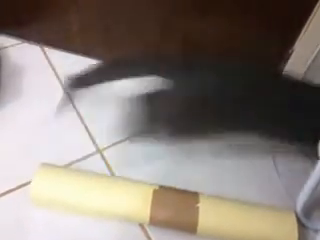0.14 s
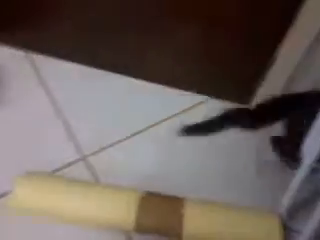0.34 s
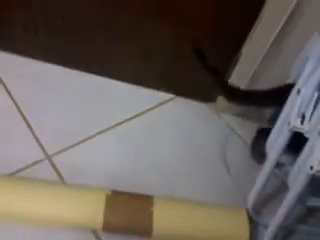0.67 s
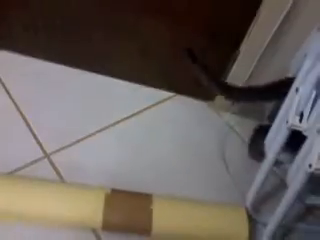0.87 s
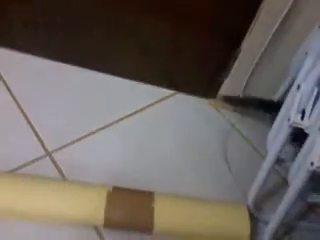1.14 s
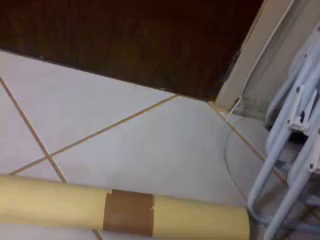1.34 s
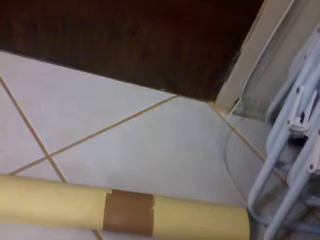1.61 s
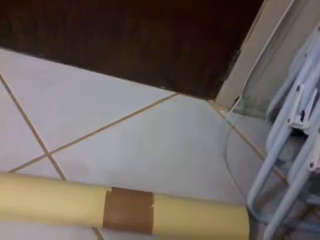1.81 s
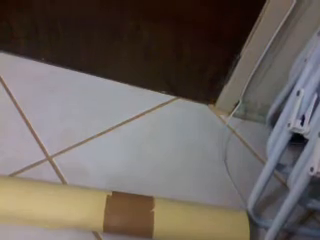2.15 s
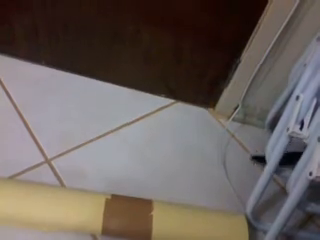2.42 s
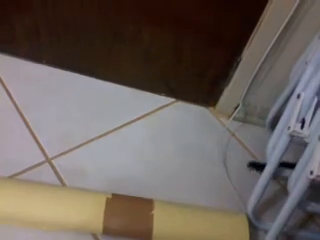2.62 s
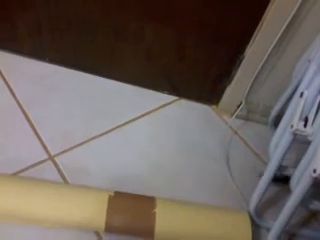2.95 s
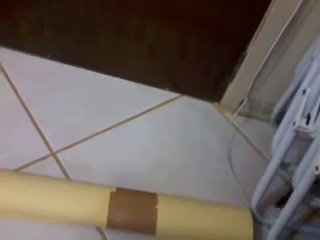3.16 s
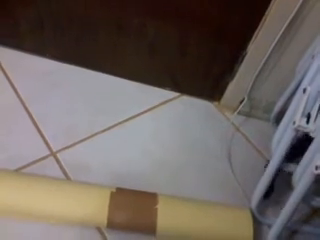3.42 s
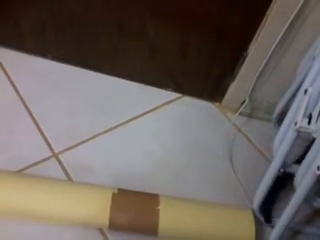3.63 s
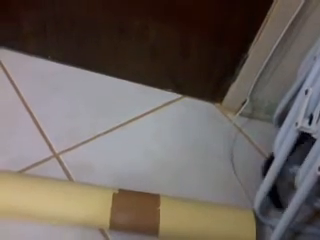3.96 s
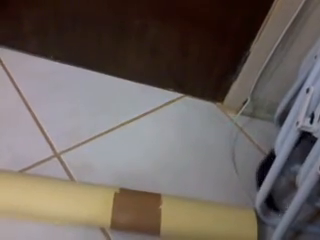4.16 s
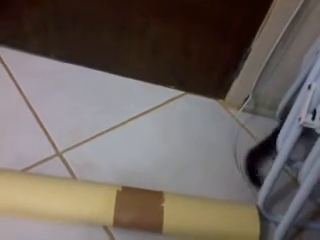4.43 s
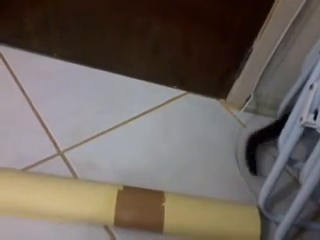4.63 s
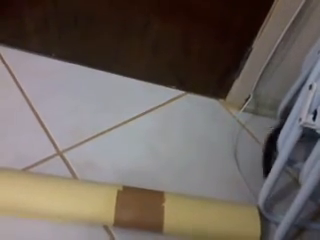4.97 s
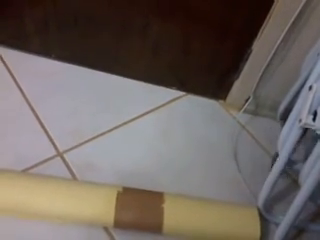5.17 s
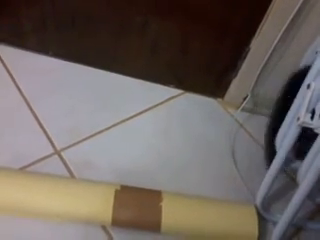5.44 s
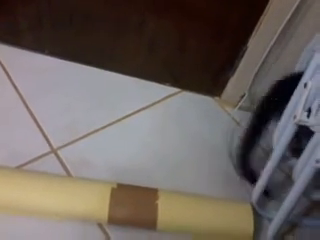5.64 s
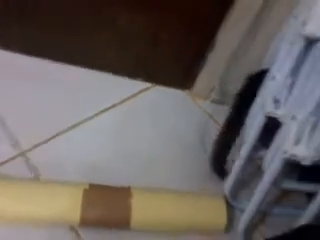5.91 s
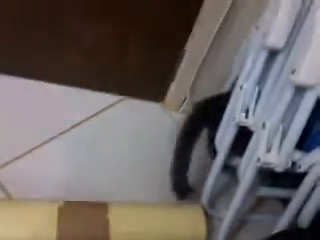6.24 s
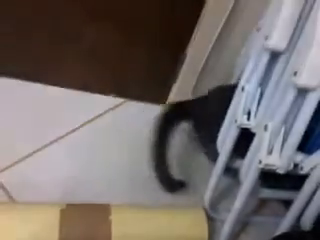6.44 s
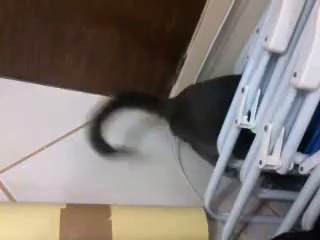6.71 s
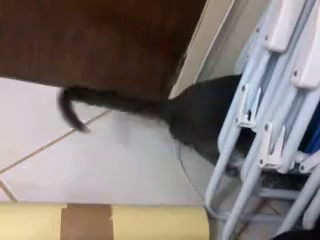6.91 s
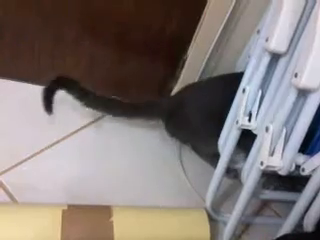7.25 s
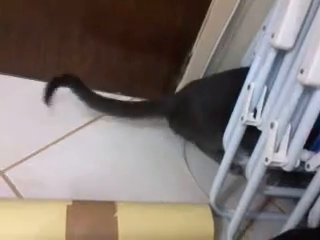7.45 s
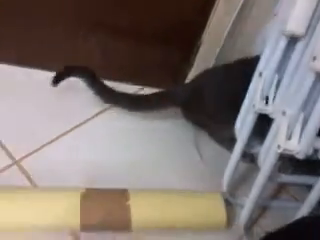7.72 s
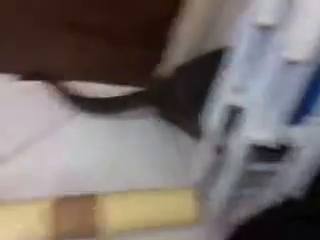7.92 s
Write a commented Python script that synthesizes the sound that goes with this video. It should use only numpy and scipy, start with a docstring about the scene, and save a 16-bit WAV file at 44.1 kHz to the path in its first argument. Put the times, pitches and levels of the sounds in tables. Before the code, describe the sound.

In a small, echoing tiled room, a phone microphone with little treble picks up soft hiss and a deep wavering hum. Metal rubs softly from the start; a cat's collar bell tinkles faintly, and light rack tubes clatter around 0.3 s, then rattle and clink from 0.6 to 1.0, with a hard clank near 0.87. It calms until a sharp dry tap at 1.9. From 2.0 to 2.9 the rack jostles busily, with scrapes, another crisp tap at 2.4 and bright pings. Between 3 and 5 there are only sparse knocks, faint bell tinkles and a firmer bump around 4.1. Rubbing and small clinks gather from 5.1 to 5.7. At 6.6 a strong ringing clatter breaks out with a soft floor thud; sharp high pings follow at 7.2 and 7.6, then a close tap at 7.8 and scraping knocks until the end at about 8.

```python
"""Loose metal rubs softly from the start as a cat stirs, and room hiss and a deep, wavering hum run throughout.
The cat, in a small collar bell, clambers behind a folded metal drying rack in a small tiled room. Bumps strike
the modes of frame and tubes, rebound and jiggle on; random slips make the rubbing, scrapes and bell rattle.
Thin parts and the bell ping, single tubes clink, and dry taps and low floor thuds sit close to a phone's
narrow-band microphone."""
import sys
import numpy as np
from scipy import signal
from scipy.fft import rfft, irfft
from scipy.io import wavfile

SR = 44100
rng = np.random.default_rng(int(sys.argv[2]) if len(sys.argv) > 2 else 0)


def bounce(signal):
    """Save signal as a 16-bit WAV file at the path given by the first command-line argument."""
    frames = np.transpose(np.atleast_2d(signal))
    limited = np.clip(frames, -1, 1)
    pcm = np.round(limited * 32767).astype(np.int16)
    wavfile.write(sys.argv[1], SR, pcm)


N = 356328
TIME = np.arange(N) / SR
RING_TIME = np.arange(3072) / SR

# colour of the room hiss: (frequency [Hz], relative density [dB per Hz])
AIR_COLOUR = [(35, -65), (60, -12.5), (146, -32.5), (189, -11.5), (236, -20), (272, -6.5), (399, -9),
              (432, -1), (518, -9.5), (646, -5), (2080, -17), (3180, -19), (4850, -26), (6430, -13.5),
              (7400, -26.5), (9620, -66), (16300, -120)]
AIR_DB = -50.5  # rms
# deep hum before its waver: (time [s], level [dB])
HUM_LEVELS = [(0.0, -50), (0.47, -54.5), (0.81, -65), (1.44, -47.5), (2.48, -61.5), (5.02, -49),
              (5.15, -54), (7.88, -48), (8.08, -55)]

# how hard the cat stirs against the rack, before the rubbing mix: (time [s], level [dB])
STIRRING = [(0.0, -45.5), (0.55, -42.5), (1.05, -59), (1.2, -56), (1.9, -54), (1.98, -36.5), (2.85, -41.5),
            (3.02, -46), (3.6, -51.5), (3.85, -43.5), (4.7, -42), (4.95, -52.5), (5.35, -47.5),
            (5.75, -38.5), (6.3, -42), (6.5, -52), (6.9, -39.5), (8.08, -43)]
# shoves that set the tubes sliding, before the rubbing mix: (time [s], length [s], level [dB])
SHOVE_EVENTS = [(0.628, 0.32, -39), (0.876, 0.11, -32.5), (2.058, 0.015, -31.5), (2.428, 0.071, -29.5),
                (2.79, 0.13, -42), (5.5, 0.15, -40), (7.654, 0.39, -35.5)]
SHOVE_ATTACK_S, SHOVE_RELEASE_S = 0.0099, 0.054
# shares of the sliding motion that reach frame and tubes
RUB_FRAME_DB, RUB_TUBE_DB = -9, -7
# tubes catch in sparse slips while the rubbing place moves
CATCHES_PER_S, CATCH_SPREAD_DB, RUB_PLACES_PER_S = 220, 3, 16
RUB_DETUNE = 0.05  # fraction of each mode's frequency

# bumps of the rack: (time [s], frame level [dB], tube level [dB], tube centre [Hz], joint level [dB],
# edge level [dB], edge centre [Hz], jiggle relative to the bump [dB], chatter time scale [s])
RACK_BUMPS = [(0.081, -48.5, -42, 1630, -46.5, -51, 6100, -11, 0.005),
              (0.186, -52, -45, 1870, -51, -46.5, 6240, -5, 0.0047),
              (0.275, -44.5, -28.5, 1450, -34, -33, 6800, -4.5, 0.0033),
              (0.314, -52, -42, 1400, -41, -35, 6600, -5, 0.0047),
              (0.329, -37, -28, 1150, -34, -26.5, 6800, -7.5, 0.0086),
              (0.634, -58, -37, 1560, -47.5, -43, 6700, -13, 0.0025),
              (0.643, -49, -30.5, 1450, -39.5, -26.5, 6640, 2, 0.0044),
              (0.675, -62, -39.5, 1600, -39, -29.5, 6400, 7, .005),
              (0.691, -56, -39, 1640, -45, -32, 6600, -6, 0.00081),
              (0.714, -57, -36, 1640, -40, -25, 6140, -2.5, 0.0034),
              (0.741, -60, -40, 1560, -38.5, -34, 5600, -13, 0.0016),
              (0.873, -30, -18, 1520, -28, -23.5, 6400, -9, 0.0023),
              (0.884, -32, -23, 1570, -30.5, -24.5, 6560, -15, 0.0014),
              (0.922, -48, -45.5, 1550, -42.5, -42, 6300, -3, .0013),
              (0.963, -37.5, -41, 1440, -51, -34.5, 6300, -1.5, 0.0049),
              (1.044, -44.5, -38.5, 1590, -53, -49, 6270, 1, 0.0034),
              (1.608, -76, -59, 1600, -61, -48, 6300, 5.5, 0.0052),
              (1.717, -54, -46.5, 1890, -59, -52, 6240, -19, 0.0028),
              (2.038, -49, -39, 1700, -47.5, -38, 6600, -4, 0.0047),
              (2.06, -35, -29.5, 1600, -39, -36, 6530, -11, 0.0031),
              (2.079, -43, -31, 1290, -47, -31.5, 6500, -17, 0.0058),
              (2.217, -37.5, -34.5, 1380, -43, -44, 6600, -16, 0.0021),
              (2.286, -34, -29, 1700, -42, -29, 6660, -14, 0.0031),
              (2.297, -45, -39, 1600, -42, -30.5, 6600, -10, 0.0021),
              (2.391, -40.5, -35.5, 1540, -48, -37, 6540, -3, 0.0037),
              (2.417, -37.5, -26.5, 1340, -38, -35.5, 6700, -14, 0.0017),
              (2.479, -42, -30.5, 1670, -37, -40, 6100, -12, 0.0032),
              (2.578, -36.5, -26, 1950, -27, -20, 6080, -4, 0.0042),
              (2.695, -42, -41, 1670, -44, -46, 6300, -23, 0.0047),
              (2.747, -35.5, -27.5, 1830, -38.5, -34, 6700, -10, 0.0021),
              (2.775, -47, -35, 1710, -40, -31.5, 6400, 5.5, 0.008),
              (2.792, -36.5, -30, 1660, -37.5, -29.5, 6370, -18, 0.002),
              (2.867, -65, -32, 1750, -35.5, -32.5, 5940, -11, 0.0079),
              (3.138, -40.5, -35, 1760, -45.5, -37, 6300, 4, .005),
              (3.686, -56, -43.5, 1080, -66, -47.5, 6700, 5.5, .002),
              (3.92, -44.5, -46, 1670, -49.5, -48, 6000, -13, 0.0032),
              (4.026, -55, -44, 1910, -48.5, -46.5, 5350, -22, 0.0041),
              (4.13, -43, -30.5, 1600, -43.5, -38, 6400, -3, 0.0021),
              (4.141, -30.5, -30.5, 1530, -43, -35, 6500, -4, .003),
              (4.371, -45, -51, 1570, -52, -42.5, 6400, -7, 0.0027),
              (4.425, -48, -49, 1700, -54, -57, 6400, -8, 0.0028),
              (4.535, -43, -41.5, 1340, -46.5, -33.5, 6600, -5, 0.0053),
              (5.086, -67, -50, 1730, -54, -50.5, 6300, 5.5, 0.008),
              (5.161, -44, -39, 1760, -42.5, -41, 6300, -3, .004),
              (5.412, -40, -34, 1760, -44, -40.5, 6340, -4, 0.0038),
              (5.474, -45, -39, 1800, -43, -40.5, 6300, -12, 0.0052),
              (5.524, -42, -42, 1750, -53, -47, 6300, -15, 0.0031),
              (5.555, -47, -41, 1680, -46, -43, 6300, 0, 0.0042),
              (5.602, -39, -40, 1700, -45, -40, 6300, -11, .003),
              (5.61, -38, -26, 1690, -35, -28.5, 6350, -19, 0.005),
              (5.935, -39.5, -38.5, 1820, -41.5, -40, 6500, -7, 0.0039),
              (6.22, -38, -34, 1720, -41, -39, 6240, 1.5, 0.0057),
              (6.239, -41.5, -39, 1580, -40, -37.5, 6400, -4.5, .0027),
              (6.541, -49, -44, 1650, -58, -45, 6300, -21, 0.0027),
              (6.584, -31, -27, 1540, -32, -24, 6140, -9, 0.0013),
              (6.622, -38, -24.5, 1540, -34.5, -28, 5860, -11, 0.0039),
              (6.636, -34, -30, 1640, -27.5, -17, 6340, -6.5, 0.0039),
              (6.713, -41, -36, 1580, -41, -35, 6270, 4.5, 0.0028),
              (6.758, -36.5, -34, 1520, -45, -47, 6300, -16, .0065),
              (6.771, -36.5, -28.5, 1390, -33.5, -26, 6500, -13, 0.0082),
              (7.012, -61, -36, 1640, -42.5, -39, 5870, -20, 0.0028),
              (7.038, -35.5, -43, 1790, -44, -41, 5970, -13, 0.0039),
              (7.1755, -36.5, -28.5, 1550, -29.5, -21, 6270, -24, 0.00098),
              (7.236, -31, -29.5, 1910, -33, -36, 5430, -22, 0.0021),
              (7.2902, -27.5, -27.5, 1750, -36.5, -29.5, 6600, -12, 0.0021),
              (7.329, -36, -34, 1600, -37.5, -38, 6300, -23, 0.0039),
              (7.398, -32, -31, 1600, -43, -49, 6350, -16, 0.0029),
              (7.416, -40.5, -39, 1850, -41, -39, 4800, -3, 0.0032),
              (7.469, -59, -56, 1750, -49, -39, 5600, -20, 0.0015),
              (7.494, -58, -46, 1900, -40, -38.5, 5670, -18, 0.0023),
              (7.624, -34, -28, 2020, -27.5, -23.5, 6040, -15, 0.0021),
              (7.724, -49, -40, 1850, -52, -40, 6300, -13, 0.00086),
              (7.864, -31.5, -33, 1970, -39, -40, 6800, -21, 0.0031),
              (7.908, -39.5, -35.5, 1940, -45, -38, 6700, -8, 0.0011),
              (7.958, -39, -38, 2000, -49, -36, 6700, -12, 0.0012),
              (7.989, -37, -30.5, 2000, -34.5, -25.5, 6200, -15, 0.0026),
              (8.003, -27, -32.5, 1500, -49, -49, 6700, -20, 0.0016)]
CONTACT_S = 0.014  # the time over which a contact's level is reckoned
FRAME_HZ = 570  # where the frame sings in every bump
EDGE_WIDTH_HZ = 3800
# the rack rocks back and strikes again, more with its frame than with its tubes
REBOUND_S = 0.011
REBOUND_DB = np.array([-7, -20.5, -5.5, -5.5])  # frame, tubes, joint, edge
# the tubes slip before they meet, then jiggle; slip level is relative to the bump
SLIP_S, SLIP_DB = 0.01, -14
JIGGLE_RISE_S, JIGGLE_T60_S = 0.004, 0.36
# loose parts tick at random, at a level relative to the sliding motion
TICKS_PER_S, TICK_DB, TICK_SPREAD_DB, TICK_JOINT_DB = 6, -10, 3, 1

# modes of the whole frame: (frequency [Hz], relative level [dB], t60 [s])
FRAME_MODES = [(255, -17, 0.076), (330, 2.5, 0.028), (394, -16, 0.0085), (441.5, -3.5, 0.088),
               (521, 1.5, 0.026), (607, 8.5, 0.014), (643, -4, 0.035), (732, 0, 0.028), (810, 6.5, 0.0055),
               (895, 5, 0.011)]
# modes of the single tubes: (frequency [Hz], relative level [dB], t60 [s])
TUBE_MODES = [(1054, -2, 0.021), (1136, -4.5, 0.014), (1255, -6, 0.022), (1335, -6, 0.033),
              (1330, -14, 0.019), (1482, 1, 0.015), (1606, -5.5, 0.02), (1723, 3.5, 0.012),
              (1849, -1, 0.018), (2074, 3.5, 0.005), (2150, -28, 0.017)]
# colour of a joint's clack: (frequency [Hz], relative level [dB])
JOINT_COLOUR = [(1500, -19.5), (2200, 0), (2900, 4), (3600, 3.5), (4300, 4), (5200, -9), (7000, -36)]
# colour of an edge's tick: (frequency [Hz], relative level [dB])
EDGE_COLOUR = [(2500, -40.5), (4200, -21.5), (4800, -5.5), (5800, -3.5), (6700, 0), (7200, -6.5),
               (7800, -4)]
# colour of a sliding contact's hiss: (frequency [Hz], relative level [dB])
SLIDE_COLOUR = [(1200, -67), (2300, -3.5), (3200, -5.5), (4400, -5.5), (5500, -3), (6900, -2.5), (7700, 3)]

# scrapes with one gliding resonance, level before the fades:
# (time [s], length [s], start frequency [Hz], end frequency [Hz], pole width [Hz], level [dB])
SCRAPE_EVENTS = [(0.075, 0.016, 5700, 5830, 3920, -40.5), (0.647, 0.081, 1690, 1600, 300, -33.5),
                 (0.665, 0.035, 6960, 6800, 600, -28.5), (1.925, 0.044, 6760, 6770, 900, -42.5),
                 (2.179, 0.048, 6360, 6900, 1100, -33), (2.211, 0.039, 394, 680, 350, -40),
                 (3.745, 0.078, 5970, 6300, 450, -40.5), (4.327, 0.028, 4430, 4600, 500, -47.5),
                 (4.706, 0.088, 5630, 5300, 700, -52.5), (6.325, 0.027, 1780, 1760, 248, -43.5),
                 (6.591, 0.067, 1560, 1700, 350, -30), (7.69, 0.1, 1850, 1880, 500, -40),
                 (7.718, 0.17, 3350, 3470, 1100, -40), (7.862, 0.2, 3250, 3100, 800, -44),
                 (7.81, 0.29, 6870, 6850, 700, -42.5)]
# shakes of the collar bell: (time [s], length [s], frequency [Hz], rms level while shaken [dB])
BELL_SHAKES = [(0.1, 0.13, 4600, -62), (0.232, 0.045, 4520, -49), (3.5, 0.29, 4130, -59),
               (3.55, 0.25, 4490, -57), (3.8, 0.12, 4500, -55), (4.33, 0.056, 4140, -55),
               (4.33, 0.16, 4430, -58), (6.683, 0.12, 4620, -46)]
BELL_T60_S = 0.08
# tubes, thin metal parts and the struck collar bell left ringing, level before rise and flutter: # (time [s],
# frequency [Hz], level [dB], t60 [s])
PING_EVENTS = [(0.871, 1052, -18.5, 0.1), (0.875, 1130, -17, 0.095), (0.873, 1337, -24, 0.099),
               (0.874, 1654, -22, 0.1), (0.276, 1566, -16, 0.033), (1.931, 4500, -47.5, 0.28),
               (2.582, 4620, -29, 0.26), (2.582, 2900, -29, 0.099), (2.581, 6360, -24, 0.098),
               (2.878, 4640, -19.5, 0.15), (2.895, 4606, -28, 0.15), (3.478, 4520, -40, 0.22),
               (4.14, 4610, -35, 0.34), (4.377, 477, -35, 0.11), (4.541, 456, -43, 0.25),
               (4.541, 1300, -39.5, 0.25), (6.583, 1545, -17, 0.21), (6.584, 1800, -21, 0.2),
               (6.583, 1588, 0, 0.026), (6.635, 6020, -23, 0.15), (6.636, 5600, -31, .25),
               (7.175, 4600, -39, 0.3), (7.175, 6480, -10, 0.049), (7.175, 3520, -10.5, 0.016),
               (7.174, 6690, -21, 0.063), (7.176, 3780, -31, 0.2), (7.175, 4930, -26, 0.34),
               (7.175, 4760, -37, 0.25), (7.236, 5690, -19, 0.03), (7.236, 4910, -21, 0.28),
               (7.236, 4760, -27.5, 0.3), (7.625, 6310, -6.5, 0.037), (7.625, 4840, -38, 0.4),
               (7.625, 4905, -30, 0.48), (7.626, 3200, -17, 0.038), (7.626, 5750, -22, 0.085)]
PING_DRIFT_HZ, PING_FLUTTER_DB, PING_SHAKES_PER_S = 14, 2.5, 140
# dry taps close to the microphone: (time [s], peak level [dB], brightness [Hz])
DRY_TAPS = [(0.35, -25, 480), (1.9277, -12, 1010), (2.357, -22.5, 590), (2.434, -10.5, 2700),
            (2.982, -26, 2800), (3.003, -33, 2600), (4.21, -26, 700), (5.698, -22.5, 1500),
            (7.589, -24, 1000), (7.772, -15, 1760)]
# soft thuds through the floor: (time [s], peak level [dB])
FLOOR_THUDS = [(0.35, -55), (1.625, -54.5), (2.36, -69), (4.15, -54), (4.44, -54), (6.583, -43),
               (7.265, -49)]
THUD_HZ, THUD_T60_S = 117, 0.02
# one tube touches another and clinks once: (time [s], frequency [Hz], envelope peak [dB])
TUBE_CLINKS = [(0.621, 1560, -33), (0.646, 1744, -16.5), (0.670, 1600, -19), (0.704, 1658, -23),
               (0.718, 1610, -22), (0.866, 1400, -28), (0.9205, 1701, -23), (0.93, 1400, -23),
               (0.9617, 1140, -24), (0.982, 1300, -26.5), (2.0597, 1281, -21), (2.295, 1550, -21),
               (2.418, 1305, -19), (2.523, 1700, -31), (2.7083, 1625, -26.5), (2.748, 1805, -16),
               (3.69, 1460, -36), (3.722, 1800, -36.5), (3.797, 1798, -29.5), (4.0261, 1820, -29.5),
               (4.569, 1800, -34), (5.095, 1730, -36), (5.163, 1740, -29), (5.4746, 1744, -32),
               (5.5677, 1765, -23), (5.6284, 1658, -34), (5.6962, 1740, -21.5), (6.183, 1750, -35),
               (7.4976, 1820, -28)]
CLINK_RISE_S = 0.0013

ROOM_PLACES_PER_S = 4
TOP_HZ = 7200  # upper edge of the microphone's band


def amp(db):
    """Decibels to gain."""
    return 10 ** (np.asarray(db) / 20)


def unit(x):
    """Scale to rms 1."""
    return x / np.sqrt(np.mean(x ** 2) + 1e-20)


def decay(t, t60):
    """Exponential fade by 60 dB in t60 seconds."""
    return np.exp(-np.log(1000) * t / t60)


def add(out, s, x):
    """Mix x into out, starting at s seconds."""
    i = max(int(s * SR), 0)
    out[i:i + len(x)] += x[:max(N - i, 0)]


def through(x, response):
    """Pass x through an impulse response."""
    return signal.fftconvolve(x, response)[:len(x)]


def click(points, size=4096):
    """The causal, minimum-phase impulse response of a given (frequency [Hz], level [dB]) colour."""
    hz, db = np.transpose(points)
    bins_hz = np.arange(size // 2 + 1) * SR / size
    gain = amp(np.interp(np.log(bins_hz + 1), np.log(hz), db))
    # folding the cepstrum forward in time makes the response causal
    cepstrum = irfft(np.log(gain))
    cepstrum[1:size // 2] *= 2
    cepstrum[size // 2 + 1:] = 0
    return irfft(np.exp(rfft(cepstrum)))


def wander(per_s):
    """A random drift with a spread of roughly 1, heading for a new value per_s times a second."""
    return np.interp(TIME * per_s, np.arange(1024), rng.standard_normal(1024))


def slips(size, per_s, spread_db):
    """Stick and slip: clicks at random moments, a few stronger than the rest."""
    happens = rng.random(size) < per_s / SR
    strength = amp(spread_db * np.minimum(rng.exponential(1, size), 3))
    return happens * rng.choice([-1, 1], size) * strength


def ring(modes, centre_hz=None, scatter_db=2, focus_db=30, detune=0.019, rise_cycles=0.45):
    """Modes swell within a cycle or so and decay; each blow shuffles them and favours those near centre_hz."""
    hz, db, t60 = np.transpose(modes)
    hz = hz * (1 + detune * rng.standard_normal(len(hz)))
    db = db + scatter_db * rng.standard_normal(len(hz))
    if centre_hz:
        db = db - focus_db * np.abs(np.log2(hz / centre_hz))  # focus_db per octave
    weight = amp(db) * rng.choice([-1, 1], len(hz))
    cycles = hz[:, None] * RING_TIME
    swell = (1 - np.exp(-cycles / rise_cycles)) ** 2
    return weight @ (np.sin(2 * np.pi * cycles) * swell * decay(RING_TIME, t60[:, None]))


def roaming(x, draw_response, per_s):
    """The sound comes from ever new places, each with its own response, fading into each other."""
    out, hop = np.zeros(N), SR // per_s
    for i in range(-hop, N, hop):
        span = np.arange(max(i, 0), min(i + 2 * hop, N))
        fade = np.sin(np.pi * (span - i) / (2 * hop))
        add(out, span[0] / SR, signal.fftconvolve(x[span] * fade, draw_response()))
    return out


def background(hum_hz=33.0, waver_hz=4.3, waver_db=4.5):
    """Even room hiss from coloured noise, over a deep sine hum that wavers in pitch and level."""
    air = amp(AIR_DB) * unit(through(rng.standard_normal(N), click(AIR_COLOUR)))
    hum = unit(np.sin(2 * np.pi * np.cumsum(hum_hz + waver_hz * wander(14)) / SR))
    hum_db = np.interp(TIME, *np.transpose(HUM_LEVELS)) + waver_db * wander(18)
    return air + hum * amp(hum_db)


def sliding():
    """How strongly the tubes slide: the cat's stirring plus each shove's attack, hold and release."""
    motion = amp(np.interp(TIME, *np.transpose(STIRRING)))
    for s, seconds, db in SHOVE_EVENTS:
        corners = s + np.array([0, SHOVE_ATTACK_S, seconds, seconds + SHOVE_RELEASE_S])
        motion = motion + amp(db) * np.interp(TIME, corners, [0, 1, 1, 0])
    return motion


def jiggling():
    """Gains of frame, tubes, joints and edges as they slip into each bump and shake on after it."""
    power, t = np.zeros((4, N)), TIME[:SR]
    slip = np.linspace(0, 1, int(SLIP_S * SR))
    shake = (1 - np.exp(-t / JIGGLE_RISE_S)) * decay(t, JIGGLE_T60_S)
    for s, frame_db, tube_db, _, joint_db, edge_db, _, jiggle_db, _ in RACK_BUMPS:
        for part, db in zip(power, (frame_db, tube_db, joint_db, edge_db)):
            add(part, s - SLIP_S, (amp(db + SLIP_DB) * slip) ** 2)
            add(part, s, (amp(db + jiggle_db) * shake) ** 2)
    return np.sqrt(power)


def rubbing(motion, per_s=800, spread_db=2.0, hiss_share=0.14, hiss_db=5, joint_db=2, edge_db=3, tube_db=-1):
    """Dense slips excite frame, joints, edges and contact hiss; sparser catches ring ever different tubes."""
    push = slips(N, per_s, spread_db) + hiss_share * rng.standard_normal(N)
    responses = ring(FRAME_MODES, detune=0), click(JOINT_COLOUR), click(EDGE_COLOUR), click(SLIDE_COLOUR)
    frame, joint, edge, hiss = (unit(through(push, response)) for response in responses)
    catches = slips(N, CATCHES_PER_S, CATCH_SPREAD_DB)
    caught = roaming(catches, lambda: unit(ring(TUBE_MODES, detune=RUB_DETUNE)), RUB_PLACES_PER_S)
    tubes = amp(tube_db) * unit(caught)
    frame_shake, tube_shake, joint_shake, edge_shake = jiggling()
    # sliding and jiggling add in power
    body = frame * np.hypot(amp(RUB_FRAME_DB) * motion, frame_shake)
    body += tubes * np.hypot(amp(RUB_TUBE_DB) * motion, tube_shake)
    rattle = amp(joint_db) * joint * joint_shake + amp(edge_db) * edge * edge_shake
    return body + rattle + amp(hiss_db) * hiss * motion


def scrapes(per_s=900, spread_db=3, fade_share=0.28):
    """Pressed harder, a sliding contact sings roughly in one resonance that glides as the contact moves."""
    out = np.zeros(N)
    for s, seconds, start_hz, end_hz, width_hz, db in SCRAPE_EVENTS:
        size = int(seconds * SR)
        turn = np.exp(2j * np.pi * np.cumsum(np.linspace(start_hz, end_hz, size)) / SR)
        pole = np.exp(-np.pi * width_hz / SR)
        grit = slips(SR, per_s, spread_db)[:size]
        # a double-pole low-pass, turned along with the glide, becomes the moving resonance
        song = np.real(turn * signal.lfilter([1], np.poly([pole, pole]), grit / turn))
        add(out, s, amp(db) * unit(song) * signal.windows.tukey(size, fade_share))
    return out


def chatter(seconds, first=0.11, count=48):
    """A first contact and a dying flurry of rebounds, spread over a time scale in seconds."""
    push = np.zeros(len(RING_TIME))
    lag = rng.gamma(1.25, 1.4, count)
    place = np.minimum(lag * max(seconds, 0) * SR, len(push) - 1).astype(int)
    hits = rng.choice([-1, 1], count) * rng.uniform(0.8, 1, count) * np.exp(-lag / 3)
    np.add.at(push, place, hits)
    push[0] += first
    return push


def burst(x, db):
    """Scale a short sound to a level of db over the time of one contact."""
    return amp(db) * x * np.sqrt(CONTACT_S * SR / (np.sum(x ** 2) + 1e-20))


def resonate(x, hz, width_hz):
    """One resonance, gain 1 at its centre."""
    return signal.lfilter(*signal.iirpeak(hz, hz / width_hz, fs=SR), x)


def strike(joint, edge, levels, tube_hz, edge_hz, seconds):
    """One contact shakes frame and tubes, clacks a joint and ticks an edge, at four levels in dB."""
    push = chatter(seconds)
    frame, tubes = ring(FRAME_MODES, FRAME_HZ, focus_db=7.0), ring(TUBE_MODES, tube_hz)
    parts = [frame, tubes, joint, resonate(edge, edge_hz, EDGE_WIDTH_HZ)]
    return sum(burst(through(push, response), db) for response, db in zip(parts, levels))


def knocks(motion, tick_hz=1700, tick_edge_hz=6300, light_chatter_s=0.002):
    """Each bump strikes and rebounds; loose parts tick at random, scaled by the sliding motion."""
    out = np.zeros(N)
    joint, edge = click(JOINT_COLOUR), click(EDGE_COLOUR)
    for s, frame_db, tube_db, tube_hz, joint_db, edge_db, edge_hz, _, seconds in RACK_BUMPS:
        levels = np.array([frame_db, tube_db, joint_db, edge_db])
        add(out, s, strike(joint, edge, levels, tube_hz, edge_hz, seconds))
        rebound = strike(joint, edge, levels + REBOUND_DB, tube_hz, edge_hz, light_chatter_s)
        add(out, s + REBOUND_S * rng.uniform(0.8, 1.2), rebound)
    tick_levels = [RUB_FRAME_DB, 0, TICK_JOINT_DB, 0]
    for place, chance in rng.random((int(TICKS_PER_S * N / SR), 2)):
        tick = strike(joint, edge, tick_levels, tick_hz, tick_edge_hz, light_chatter_s)
        gain = motion[int(place * N)] * amp(TICK_DB + TICK_SPREAD_DB * (2 * chance - 1))
        add(out, place * N / SR, gain * tick)
    return out


def jingles(per_s=400):
    """The pellet rolls about in the collar bell and keeps its decaying note alive."""
    out, t = np.zeros(N), TIME[:SR]
    for s, seconds, hz, db in BELL_SHAKES:
        pellet = slips(len(t), per_s, 0.56) * (t < seconds)
        pellet[0] += 1
        note = through(pellet, np.sin(2 * np.pi * hz * t) * decay(t, BELL_T60_S))
        add(out, s, amp(db) * note / np.std(note[t < seconds]))
    return out


def waver(hz, drift_hz, flutter_db, per_s):
    """A second of a note whose pitch and level shake as the part touches its neighbours."""
    drift, flutter = (np.interp(TIME[:SR] * per_s, np.arange(512), rng.standard_normal(512)) for _ in range(2))
    return np.sin(2 * np.pi * np.cumsum(hz + drift_hz * drift) / SR) * amp(flutter_db * flutter)


def pings(rise_s=0.0009):
    """Tubes, thin metal parts and the collar bell ring on, each with one slightly shaky, decaying pitch."""
    out, t = np.zeros(N), TIME[:SR]
    for s, hz, db, t60 in PING_EVENTS:
        note = waver(hz, PING_DRIFT_HZ, PING_FLUTTER_DB, PING_SHAKES_PER_S)
        add(out, s, amp(db) * note * decay(t, t60) * (1 - np.exp(-t / rise_s)))
    return out


def taps():
    """Short dry taps: a strong first contact and a few rebounds, coloured by a brightness."""
    out = np.zeros(N)
    for s, db, hz in DRY_TAPS:
        colour = [(90, -35), (240, 0), (hz, 0), (4.1 * hz, -20), (16000, -40)]
        tap = through(chatter(0.0032, first=3.4, count=8), click(colour))
        add(out, s, amp(db) * tap / np.abs(tap).max())
    return out


def thuds(rise_s=0.0024):
    """Weight comes down on the floor: a few dull cycles of a damped sine."""
    out, t = np.zeros(N), RING_TIME
    thud = np.sin(2 * np.pi * THUD_HZ * t) * (1 - np.exp(-t / rise_s)) * decay(t, THUD_T60_S)
    for s, db in FLOOR_THUDS:
        add(out, s, amp(db) * thud / thud.max())
    return out


def clinks():
    """A single tube swells for a few cycles and is damped at once."""
    out = np.zeros(N)
    shape = RING_TIME / CLINK_RISE_S * np.exp(1 - RING_TIME / CLINK_RISE_S)
    for s, hz, db in TUBE_CLINKS:
        add(out, s, amp(db) * shape * np.sin(2 * np.pi * hz * RING_TIME))
    return out


def echoes(t60_low=0.3, t60_high=0.35, low_db=-2, high_db=1, first_s=0.0037, build_s=0.0027):
    """Tiles and a door: sparse early echoes thicken into a bright tail, split at 2500 Hz."""
    t = TIME[:SR // 2]
    late = np.maximum(t - first_s, 0)
    density = np.minimum(0.01 + 12 * late, 1)
    arrivals = rng.standard_normal(len(t)) * (rng.random(len(t)) < density) / np.sqrt(density)
    arrivals = arrivals * (1 - np.exp(-late / build_s))
    low = signal.sosfilt(signal.butter(2, 2500, fs=SR, output="sos"), arrivals)
    high = signal.sosfilt(signal.butter(2, 2500, "high", fs=SR, output="sos"), arrivals)
    response = 0
    # the high band is flipped so the two add up around the split
    for band, t60, db in [(low, t60_low, low_db), (-high, t60_high, high_db)]:
        fade = decay(t, t60)
        response = response + amp(db) * band * fade / np.linalg.norm(fade)
    return response


def room(x):
    """Each place on the rack has its own pattern of echoes."""
    return roaming(x, echoes, ROOM_PLACES_PER_S)


def scene(bass_edge_hz=185, knock_room_db=-2.0, rub_direct_db=-4, rub_room_db=-8, ping_room_db=-10,
          tap_room_db=-16, scrape_room_db=-4, clink_room_db=-7):
    """Rack, bell, taps, floor thuds, room and background at one microphone."""
    ambience, motion = background(), sliding()
    rub, scrape, knock = rubbing(motion), scrapes(), knocks(motion)
    metal, tap, clink = jingles() + pings(), taps(), clinks()
    # the rubbing comes from behind the rack, partly screened from the microphone
    direct = amp(rub_direct_db) * rub + scrape + knock + metal + tap + clink
    to_room = amp(rub_room_db) * rub + amp(scrape_room_db) * scrape + amp(knock_room_db) * knock
    to_room += amp(ping_room_db) * metal + amp(tap_room_db) * tap + amp(clink_room_db) * clink
    # thin tubes radiate almost no bass
    radiation = signal.butter(6, bass_edge_hz, "high", fs=SR, output="sos")
    return (signal.sosfilt(radiation, direct + room(to_room)) + thuds() + ambience)[None]


def record(dry, ceiling=4.9):
    """The phone cuts the treble steeply above TOP_HZ; a high ceiling leaves the knocks almost untouched."""
    limited = ceiling * np.tanh(dry / ceiling)
    return signal.sosfilt(signal.cheby1(12, 0.3, TOP_HZ, fs=SR, output="sos"), limited)


dry = scene()
out = record(dry)
bounce(out)
```